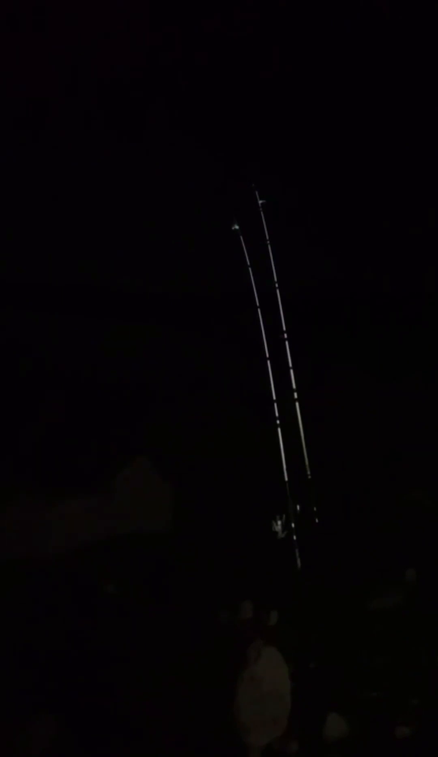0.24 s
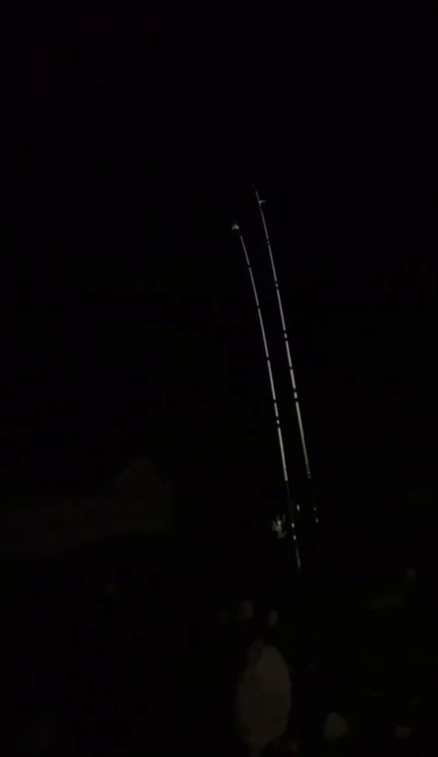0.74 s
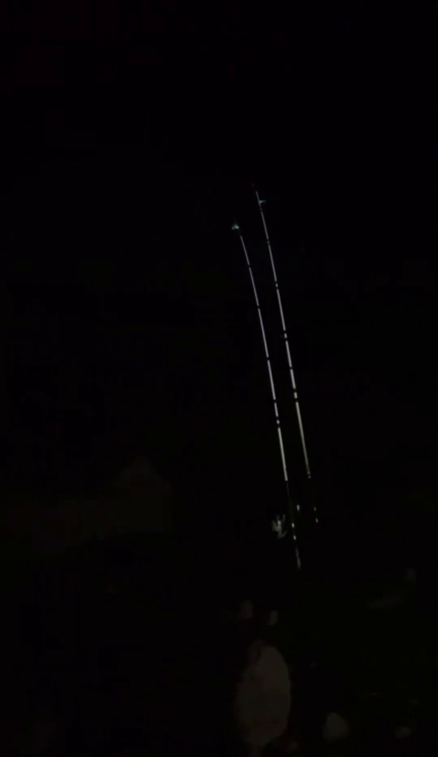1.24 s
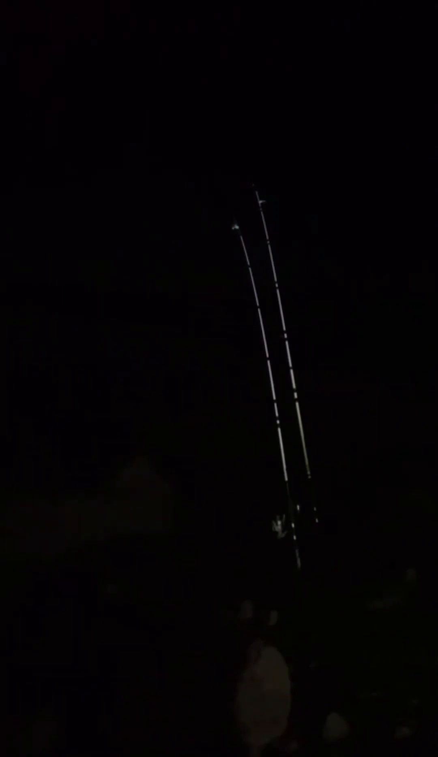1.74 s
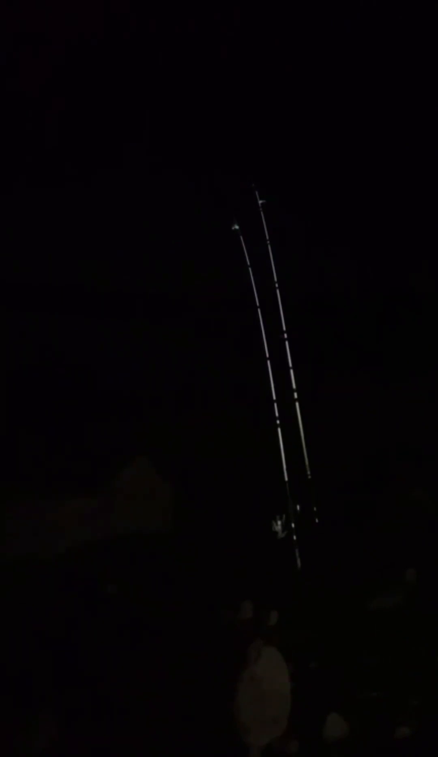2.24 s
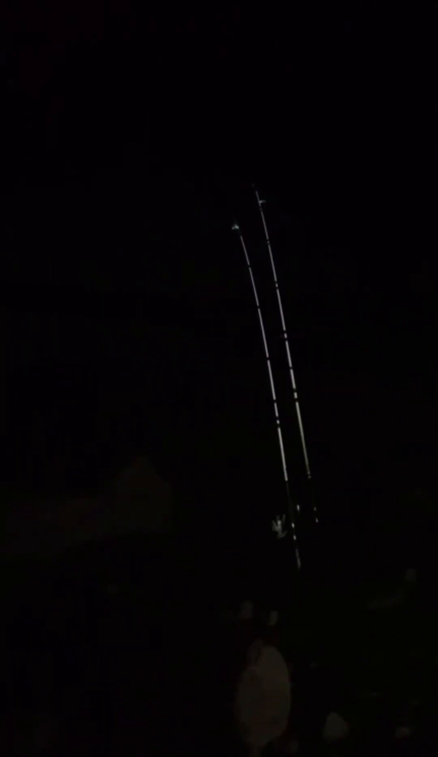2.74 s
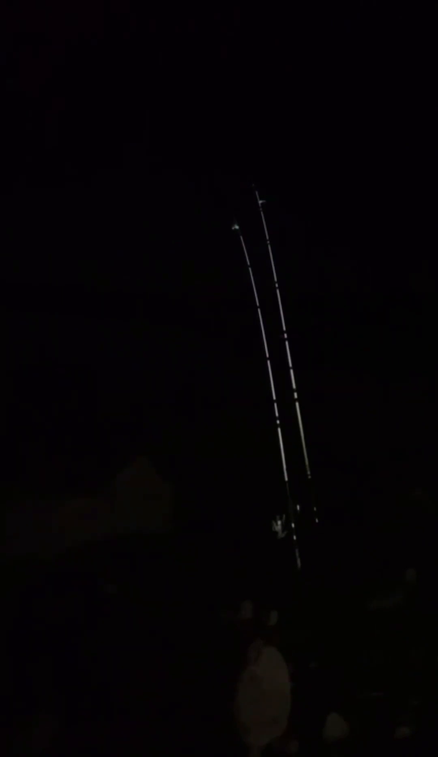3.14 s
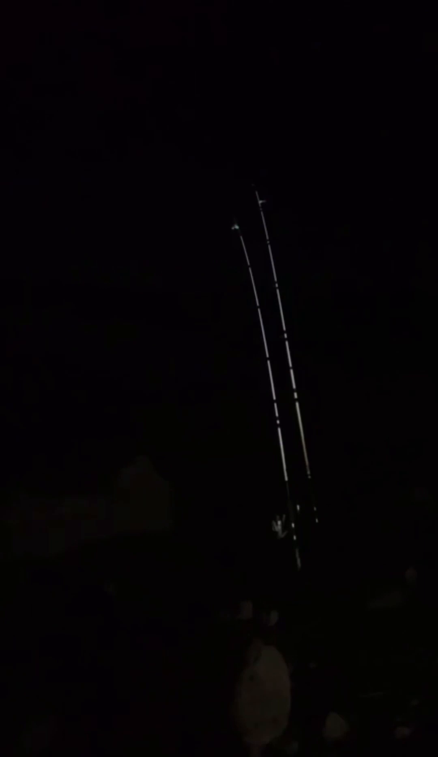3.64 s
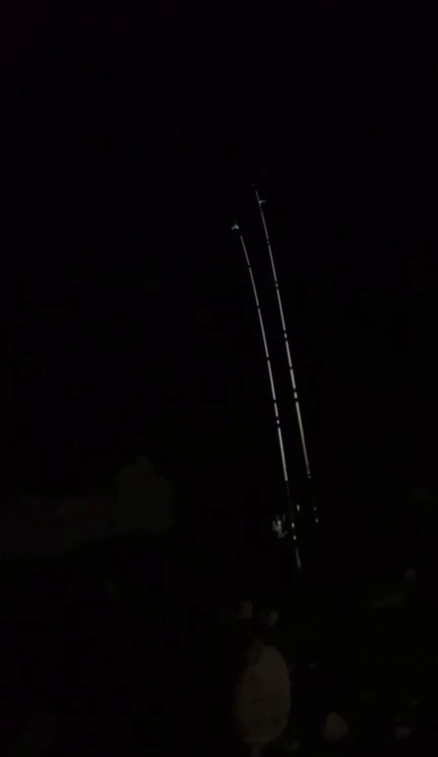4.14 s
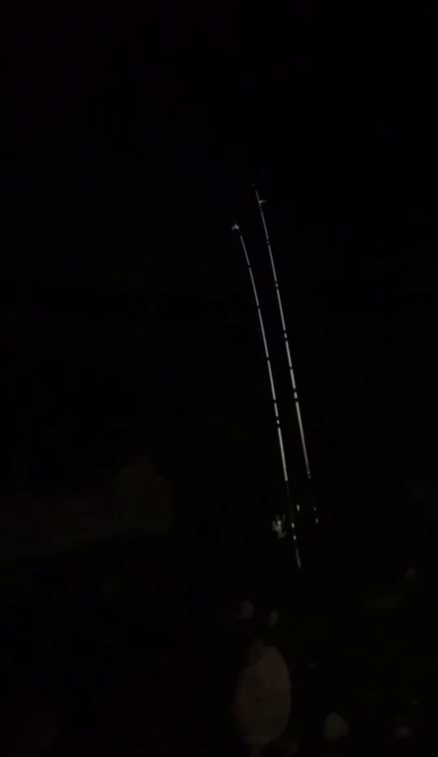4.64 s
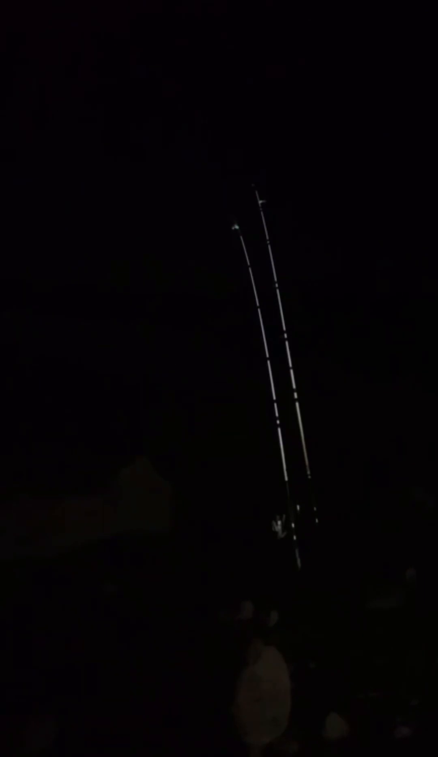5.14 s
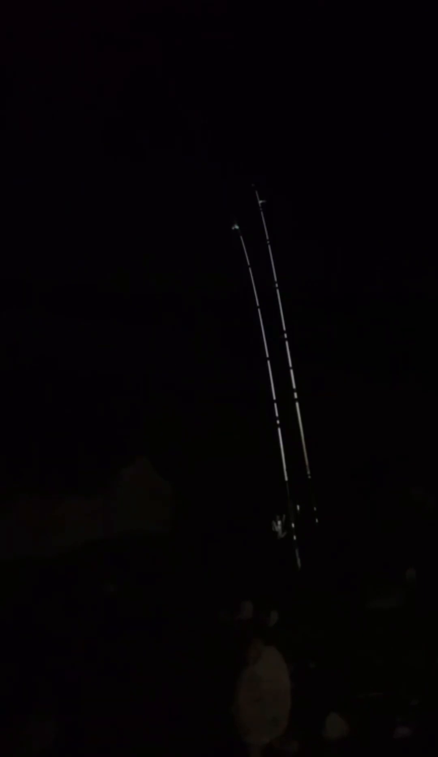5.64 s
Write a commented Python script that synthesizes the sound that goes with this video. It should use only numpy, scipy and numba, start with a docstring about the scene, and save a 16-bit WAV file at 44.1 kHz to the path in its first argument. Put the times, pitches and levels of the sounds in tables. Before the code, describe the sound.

Two small slotted bells on a fishing rod jingle a few metres away on a night bank. A quick bright flurry comes first, then near quiet; a hard tackle clack at about two seconds, more loose jingling, a lull, then stronger shaking after four seconds and the loudest burst past five. Faint rustling and a low distant hum surround it; mono phone sound, dry and open.

```python
"""A pair of small slotted bells clipped to a fishing rod jingle in bursts on a bank at night, a few metres away.
Loose pellets strike and skip inside the shells: impulses excite decaying modes, while the pellets' load
lowers the pitch and their contact chokes the ring; shaped noise gives the rasp of their rolling.
Tackle knocks (decaying notes and noise), cloth rustles (grainy noise) and thin high pings (sines) lie nearby,
over a distant low hum and a faint hiss of filtered noise."""
import sys
import numpy as np
from scipy import signal
from scipy.fft import rfft, irfft
from scipy.io import wavfile
from scipy.ndimage import uniform_filter1d
from numba import njit

SR = 44100
rng = np.random.default_rng(int(sys.argv[2]) if len(sys.argv) > 2 else 0)


def amplitude_ratio(level_db):
    """Convert a level in decibels to the matching linear amplitude (field) ratio."""
    exponent = np.asarray(level_db, float) / 20
    return 10 ** exponent


def master_out(mix):
    """Clip the mix to full scale and print it as 16-bit PCM to the path in sys.argv[1]."""
    frames = np.transpose(np.atleast_2d(mix))
    ceiling = np.clip(frames, -1, 1)
    pcm = np.round(ceiling * 32767).astype(np.int16)
    wavfile.write(sys.argv[1], SR, pcm)


N = 259528  # length [samples]

# clear pellet strikes: (time [s], strength [dB], share of the higher bell [0-1])
STRIKES = [(0.1805, -33, 0.5), (0.2376, -36.5, 0.86), (0.2995, -42, 0.6), (0.318, -31, 0.5),
           (0.365, -28.5, 0.5), (0.3947, -28, 0.6), (0.4253, -20.5, 0.4), (0.4435, -16, 0.3),
           (0.4643, -41, 0.5), (0.5049, -17, 0.7), (0.601, -41, 0.6), (0.6217, -21.5, 0.04),
           (0.7057, -30.5, 0.1), (0.722, -20, 0.5), (0.7851, -41, 1), (0.8976, -34, 0.1),
           (0.9672, -27, 0.45), (1.033, -33.5, 0.2), (1.1332, -37, 0.5), (1.253, -28.5, 0),
           (1.29, -37, 0.2), (1.9173, -29, 0.04), (2.0118, -27.5, 0.38), (2.0487, -29, 0.5),
           (2.1787, -22, 0.8), (2.2796, -26.5, 0.4), (2.3126, -33.5, 0.6), (2.3433, -27.5, 0.6),
           (2.4431, -29.5, 0.7), (2.493, -48, 0.4), (2.5316, -49, 0.5), (2.6592, -33, 0.4),
           (2.685, -22, 0.98), (2.7148, -27.5, 0.2), (2.7416, -28, 0.76), (2.8148, -29.5, 0.6),
           (2.9716, -40, 0.4), (3.0113, -33, 0.4), (3.038, -32, 0.7), (3.0769, -32.5, 0.6),
           (3.133, -31, 0.2), (3.151, -28.5, 0.2), (3.223, -21.5, 0.7), (3.247, -27, 0.67),
           (3.573, -22.5, 0.17), (4.087, -13, 0), (4.119, -13.5, 0), (4.1596, -17, 0.4),
           (4.2012, -24, 0.93), (4.2393, -20, 0.7), (4.2872, -49, 0.5), (4.3135, -31, 0.5),
           (4.3332, -22.5, 0.4), (4.353, -26, 0.8), (4.371, -14.5, 0.25), (4.467, -26, 0.44),
           (4.5135, -30.5, 0.7), (4.5672, -26.5, 0.75), (4.6043, -25.5, 0.9), (4.66, -27, 0.5),
           (4.681, -23.5, 0), (4.7253, -25, 0.54), (4.8434, -29.5, 0.7), (4.8535, -27.5, 0.4),
           (4.8984, -27.5, 0.3), (4.9247, -22.5, 1), (5.0521, -29.5, 0.03), (5.13, -26.5, 0.5),
           (5.148, -38, 0.6), (5.2333, -25, 0.2), (5.2613, -11.5, 0.3), (5.308, -5, 0.54),
           (5.372, -15, 0.2), (5.395, -13.5, 0), (5.4321, -27, 0.7), (5.452, -14.5, 0.4),
           (5.4921, -20, 0.6), (5.5339, -20, 0), (5.5697, -26.5, 0.5), (5.5947, -24.5, 0.4),
           (0.0697, -45, 0.35), (1.1453, -27.5, 0), (1.5085, -42, 0.5), (1.5484, -41, 0.4),
           (1.6302, -48, 0.4), (1.6906, -45, 0.5), (1.7639, -43.5, 0.6), (1.8253, -47, 0.5),
           (2.0694, -29, 0.4), (3.3662, -37, 0.5), (3.5199, -42, 0.5), (3.689, -34.5, 0.4),
           (3.7214, -39.5, 0), (5.2814, -14, 0.6), (5.3234, -12, 0.6), (5.3354, -16, 0.4)]
# shaking of the rod tip: (time [s], level of the skipping pellets [dB], rasp re the skipping [dB])
SHAKE = [(0.0, -50.5, -16), (0.29, -63, -8), (0.38, -42.5, -19), (0.52, -36.5, -12), (0.59, -43.5, -13.5),
         (0.82, -47.5, -13), (1.15, -51.5, -28), (1.31, -50.5, -26), (1.51, -55.5, -33), (1.74, -71.5, -19),
         (1.93, -50, -14.5), (2.11, -48.5, -11.5), (2.34, -52, -7.5), (2.49, -43.5, -18.5),
         (3.19, -51.5, -14), (3.36, -56.5, -13), (3.96, -55.5, -8.5), (4.11, -42, -12), (4.26, -37, -10.5),
         (4.77, -51.5, -18), (4.86, -47, -6.5), (4.95, -38, -35), (5.31, -36, -32), (5.47, -38, -33),
         (5.63, -56, -9.5), (5.88, -68, 3)]
# spectrum of pellet rasping on shell, also lent to the hiss: (frequency [Hz], gain [dB])
RASP = [(2500, -40), (3300, -1), (5000, -8), (7500, -9), (8700, -23), (10000, 4.5), (11300, -12.5),
        (12100, -35), (13500, -3.5), (15300, -6.5), (16500, -46)]


def curve(table):
    """Linear interpolation: the columns of a time table, one value per sample."""
    s, *columns = np.transpose(table)
    return [np.interp(np.arange(N) / SR, s, c) for c in columns]


def unit(x):
    """Normalisation to an rms of 1."""
    return x / np.sqrt(np.mean(x ** 2))


def colour(x, points):
    """Spectral shaping: gains in dB interpolated over log frequency between (Hz, dB) points."""
    hz, db = np.transpose(points)
    f = np.maximum(np.fft.rfftfreq(len(x), 1 / SR), 1)
    gain_db = np.interp(np.log(f), np.log(hz), db)
    return irfft(rfft(x) * amplitude_ratio(gain_db), len(x))


def band(x, lo_hz, hi_hz):
    """Band-pass filtering with a Butterworth response."""
    return signal.sosfilt(signal.butter(2, [lo_hz, hi_hz], "band", fs=SR, output="sos"), x)


def walk(rate):
    """Random modulation: levels held 1 / rate s and smoothed twice, with an rms of 1."""
    k = int(SR / rate)
    held = np.repeat(rng.standard_normal(N // k + 1), k)
    return unit(uniform_filter1d(uniform_filter1d(held, k), k)[:N])


def fade(t60, size):
    """Exponential decay: damping takes the level down 60 dB in t60 s."""
    return np.exp(-np.log(1000) * np.arange(size) / SR / t60)


def add(out, s, x):
    """Superposition: mix x into out at time s."""
    i = int(s * SR)
    out[i:i + len(x)] += x[:N - i]


@njit
def ring(push, keep, turn, loss, soft):
    """Damped resonance of one mode: soft contact spreads each push, and grip chokes the old ring."""
    out, contact, mode = np.empty(len(push)), 0j, 0j
    for i in range(len(push)):
        spin = np.exp(1j * turn[i])  # phase advance, free to move with the pitch
        contact = contact * soft * spin + push[i]
        mode = mode * keep[i] * loss * spin + (1 - soft) * contact
        out[i] = mode.imag
    return out


def bell():
    """Modal excitation: strikes and skips of the two pellets ring their shells, load and choke them."""
    # shell modes: (frequency [Hz], gain [dB], unchoked t60 [s], bell [0 lower, 1 higher])
    shell_modes = [(4199, -3, 0.037, 1), (4118, 1, 0.12, 0), (4008, -12.5, 0.092, 0),
                   (3876, -14.5, 0.099, 1), (3756, -19, 0.12, 0), (4302, -11, 0.059, 1),
                   (4462, -14.5, 0.44, 1), (4810, -22, 0.19, 0), (4585, -32.5, 0.36, 0),
                   (5990, -31.5, 0.1, 1), (6700, -32, 0.036, 0), (7330, -32.5, 0.045, 1),
                   (9440, -35, 0.0098, 0), (9730, -28.5, 0.029, 0), (9780, -28.5, 0.021, 1),
                   (11760, -41.5, 0.046, 1), (11280, -35, 0.054, 0)]
    skips_per_s, skip_spread_db, spot_db = 300, 3.5, 4
    strike_choke, skip_choke = 0.61, 0.19
    sag, sag_cap = 0.007, 2.5  # share of pitch lost per unit load; limit of the load
    contact_s, rasp_db, rasp_t60_s = 0.001, -30, 0.045
    s, db, share = np.transpose(STRIKES)
    at, share = (s * SR).astype(int), np.clip(share, 0, 1)
    skip_level = skipping()
    spot = rng.standard_normal((len(s), len(shell_modes)))
    out, impacts = np.zeros(N), np.zeros(N)
    for which, weight in enumerate([np.sqrt(1 - share), np.sqrt(share)]):
        touch = rng.random(N) < skips_per_s / SR
        skips = touch * amplitude_ratio(skip_spread_db * rng.standard_normal(N)) * skip_level
        # where the pellet lies between two skips sets how far it drags the pitch down
        pellet_load = rng.exponential(size=N)[np.cumsum(touch)] ** 2 / 2
        pitch = 1 - sag * np.minimum(pellet_load, sag_cap)
        grip = skip_choke * touch
        grip[at] = strike_choke * weight
        keep = np.exp(-np.abs(uniform_filter1d(grip, size=40)))
        for k, (mode_hz, mode_db, t60, shell) in enumerate(shell_modes):
            if round(shell) != which:
                continue
            push = skips * amplitude_ratio(spot_db * rng.standard_normal(N)) + 1e-18
            # each strike lands on another spot and favours other overtones; the two main modes stay even
            push[at] = weight * amplitude_ratio(db + spot_db * spot[:, k] * (k > 1))
            turn = 2 * np.pi * mode_hz * pitch / SR
            loss, soft = 1000 ** (-1 / (t60 * SR)), np.exp(-1 / (contact_s * SR))
            out += amplitude_ratio(mode_db) * ring(push, keep, turn, loss, soft)
        impacts += skips
    impacts[at] = amplitude_ratio(db)
    burst = np.convolve(impacts, fade(rasp_t60_s, 1500))[:N] * rng.standard_normal(N)
    return out + amplitude_ratio(rasp_db) * colour(burst, RASP)


def skipping():
    """Repeated impact: the skips' strength follows the shaking, decaying bounces and the rests."""
    # moments when the pellets come to rest: (middle [s], length [s], level change [dB])
    rests = [(0.167, 0.022, -11), (0.24, 0.065, -10), (1.457, 0.044, -26), (1.59, 0.11, -23),
             (1.728, 0.034, -13), (2.585, 0.12, -15.5), (2.937, 0.088, -7), (3.478, 0.038, -15),
             (4.803, 0.039, -15), (4.999, 0.089, -14), (5.215, 0.07, -13)]
    bounce_db, bounce_t60_s = -19.5, 0.16  # bounces after a strike: level re the strike, decay
    t, strikes = np.arange(N) / SR, np.zeros(N)
    s, db, _ = np.transpose(STRIKES)
    strikes[(s * SR).astype(int)] = amplitude_ratio(db + bounce_db)
    bounces = signal.lfilter([1], [1, -1000 ** (-1 / (bounce_t60_s * SR))], strikes)
    rests_db = sum(change_db * np.exp(-(2 * (t - mid) / length) ** 2) for mid, length, change_db in rests)
    return (amplitude_ratio(curve(SHAKE)[0]) + bounces) * amplitude_ratio(rests_db)


def tackle():
    """Damped impact: knocks join a short note to a noisy crack, bumps are dull, ticks mostly treble."""
    # knocks: (time [s], level [dB], note [Hz], gain of the crack's treble [dB])
    knocks = [(1.8908, -41, 2660, -5), (1.9246, -36.5, 1190, -19), (2.1733, -15, 2974, -6),
              (2.1807, -5.5, 2310, -7), (2.2623, -28.5, 1660, -31), (2.2872, -24.5, 1790, -10.5),
              (2.3118, -23.5, 1530, -13), (2.3382, -29, 1495, -13), (2.835, -36.5, 2380, -6),
              (2.9067, -41.5, 920, -3), (3.1951, -40, 970, -26), (3.913, -39.5, 1230, -6),
              (4.807, -34, 930, -14), (5.2945, -27.5, 2290, 11), (5.308, -33, 1890, -5),
              (5.326, -42, 2280, 10)]
    # spectrum of the crack: (frequency [Hz], gain [dB])
    knock_body = [(120, -53), (200, -50), (1200, -4.5), (2040, -4), (2280, 2), (2680, -10), (2940, 1),
                  (3800, -3.5), (5370, -5.5), (6810, -17), (15800, -28.5)]
    # soft low bumps: (time [s], level [dB], centre frequency [Hz])
    bumps = [(3.601, -40.5, 754), (3.757, -44, 700), (3.924, -38, 620), (4.829, -36.5, 372),
             (5.197, -33, 650), (5.369, -33.5, 704)]
    # thin bright ticks: (time [s], level [dB])
    ticks = [(0.2364, -23), (0.37, -34.5), (0.383, -27.5), (0.3947, -25.5), (0.4048, -26), (0.412, -32),
             (3.9085, -44), (4.151, -43), (5.2967, -14.5), (5.772, -43), (5.8137, -45)]
    note_db, body_db, bump_width = -5, -4, 1.26  # width: ratio of band edge to centre
    out, size = np.zeros(N), 8000
    t = np.arange(size) / SR
    note_fade = fade(0.055, size)
    tail = fade(0.073, size) + amplitude_ratio(-22) * fade(0.36, size)  # crack, then a weaker, longer echo
    for s, db, hz, treble_db in knocks:
        crack = unit(colour(rng.standard_normal(size), knock_body))
        low = band(crack, 560, 1700) * amplitude_ratio(body_db)
        high = band(crack, 5400, 19845) * amplitude_ratio(treble_db)
        note = np.sin(2 * np.pi * hz * t) * note_fade * amplitude_ratio(note_db)
        add(out, s, amplitude_ratio(db) * (note + (low + high) * tail) * np.minimum(t / 0.00054, 1))
    for s, db, hz in bumps:
        thud = unit(band(rng.standard_normal(size), hz / bump_width, hz * bump_width))
        add(out, s, amplitude_ratio(db) * thud * fade(0.056, size) * np.minimum(t / 0.001, 1))
    for s, db in ticks:
        noise = rng.standard_normal(size)
        bright = unit(band(noise, 14960, 18500)) + amplitude_ratio(-15.0) * band(noise, 2800, 10700)
        add(out, s, amplitude_ratio(db) * bright * fade(0.039, size))
    return out


def rustle():
    """Friction as modulated noise: cloth swells in the middle range, rolling pellets rasp in the treble."""
    # cloth rustles: (loudest at [s], level [dB], rise over 20 dB [s], fall over 20 dB [s])
    rustles = [(0.28, -62, 0.089, 0.98), (2.05, -62.5, 0.3, 0.1), (2.3, -46, 0.12, 0.12),
               (2.86, -60, 0.12, 0.62), (3.2, -63.5, 0.68, 0.44), (4.03, -52, 0.25, 0.41),
               (4.9, -56.5, 0.49, 0.29), (5.305, -40, 0.11, 0.19), (5.9, -46.5, 0.17, 0.2)]
    t, cloth = np.arange(N) / SR, np.zeros(N)
    for s, db, rise, fall in rustles:
        cloth += amplitude_ratio(db - 20 * np.maximum((s - t) / rise, (t - s) / fall))
    rasp_db = curve(SHAKE)[1]
    # random level changes make the grain
    mid = unit(band(rng.standard_normal(N), 670, 5600) * amplitude_ratio(2.6 * walk(40)))
    treble = unit(colour(rng.standard_normal(N) * amplitude_ratio(4.1 * walk(49)), RASP))
    return mid * cloth + treble * skipping() * amplitude_ratio(rasp_db)


def pings():
    """Pure tones in soft-edged envelopes: thin high pings, perhaps an insect."""
    # pings: (time [s], peak level [dB], length [s])
    ping_table = [(0.65, -56, 0.03), (0.961, -55.5, 0.025), (1.167, -63.5, 0.027), (3.132, -53.5, 0.082)]
    ping_hz = 9200
    out = np.zeros(N)
    for s, db, length in ping_table:
        t = np.arange(int(length * SR) + 2) / SR
        envelope = np.sqrt(np.abs(np.sin(np.pi * t / t[-1])))
        add(out, s, amplitude_ratio(db) * np.sin(2 * np.pi * ping_hz * t) * envelope)
    return out


def night():
    """Filtered noise: a distant hum, narrow bands heard as wavering tones, and a faint hiss."""
    # spectrum of the hum before its level is set: (frequency [Hz], gain [dB])
    hum_spectrum = [(15, -75), (25, -63), (47, -9.5), (106, -5), (164, -4), (250, -15), (525, -12.5),
                    (604, -10), (695, -2.5), (849, -11.5), (997, -8.5), (1320, -12.5), (3000, -55),
                    (3900, -124), (6600, -120)]
    # slow change of the hum's level: (time [s], change [dB])
    swell = [(0, -1), (1.3, 0), (2.8, -0.5), (3.9, 2.5), (4.5, -3.7), (5.1, 4), (5.88, -1.5)]
    # far wavering tones: (centre [Hz], width [Hz], level before the wavering [dB])
    tones = [(92, 42, -60.5), (712.4, 14.3, -66.5), (1072.5, 19, -67)]
    hum_db, hiss_db = -52, -66  # hum before its swell; gain of the hiss
    level_db = hum_db + curve(swell)[0] + 1.0 * walk(1.8)
    out = unit(colour(rng.standard_normal(N), hum_spectrum)) * amplitude_ratio(level_db)
    for hz, width, db in tones:
        tone = unit(band(rng.standard_normal(N), hz - width / 2, hz + width / 2))
        out = out + tone * amplitude_ratio(db + 2.54 * walk(2.36))
    return out + amplitude_ratio(hiss_db) * colour(rng.standard_normal(N), RASP)


def scene():
    """Superposition of everything on the bank, in mono."""
    return (bell() + tackle() + rustle() + pings() + night())[None]


def low_pass(x):
    """Removes everything above the highest recorded frequency."""
    return signal.sosfilt(signal.butter(12, 16820, fs=SR, output="sos"), x)


def record(dry):
    """Low-pass filtering: the phone cuts the top with a steep elliptic filter at 15800 Hz."""
    cut = signal.sosfilt(signal.ellip(8, .2, 70, 15800, fs=SR, output="sos"), dry)
    return low_pass(cut)


dry = scene()
out = record(dry)
master_out(out)
```